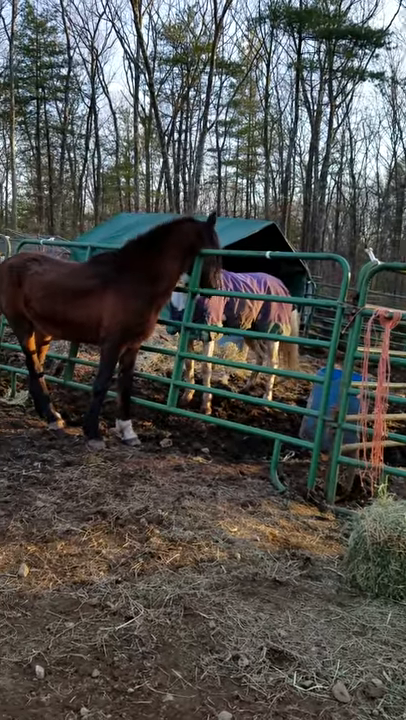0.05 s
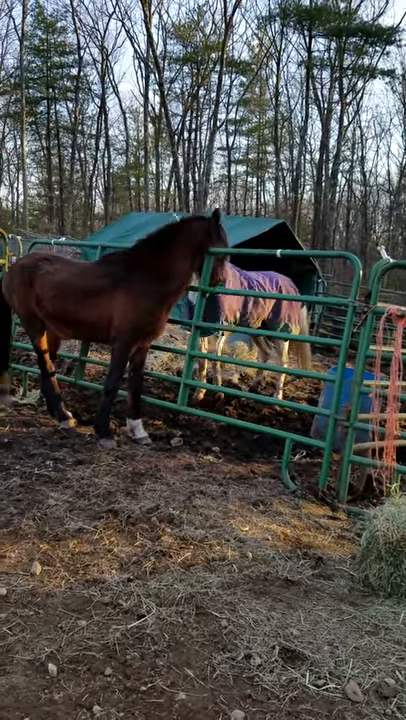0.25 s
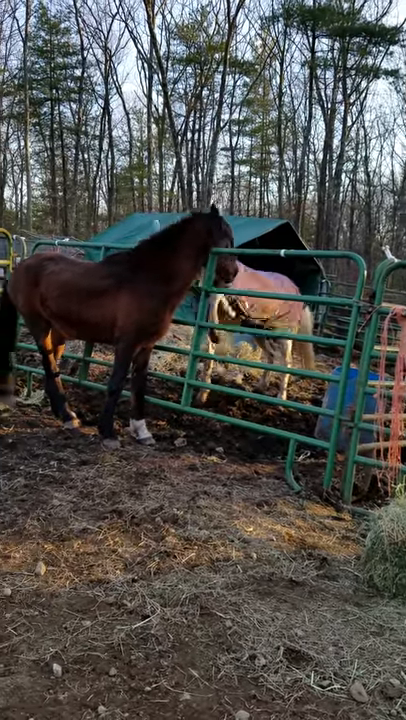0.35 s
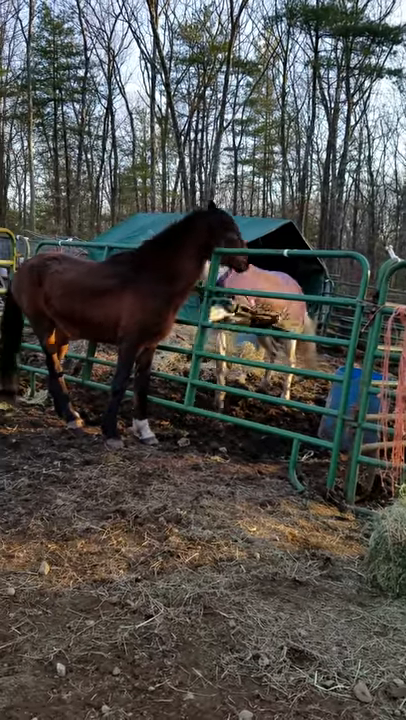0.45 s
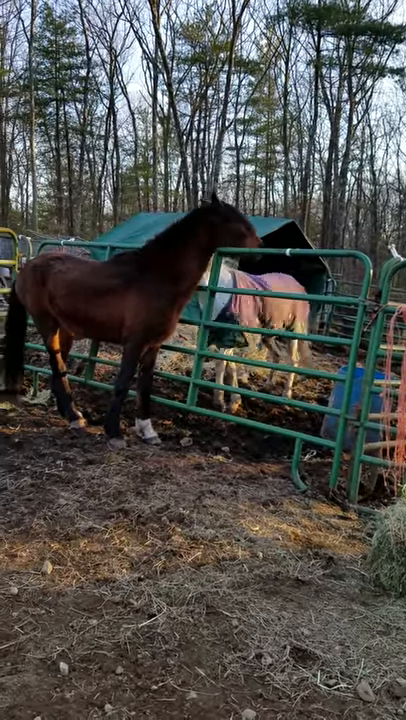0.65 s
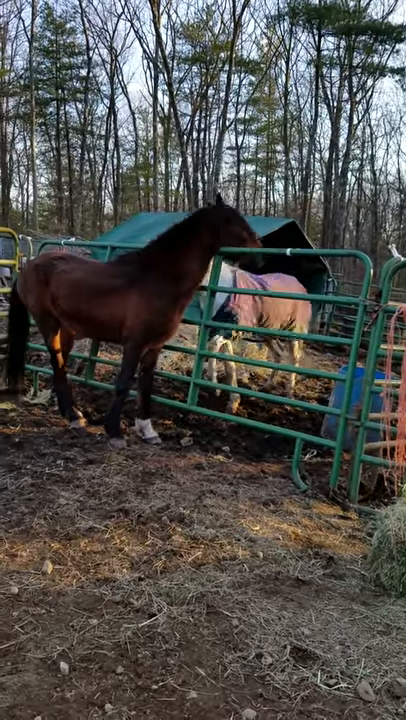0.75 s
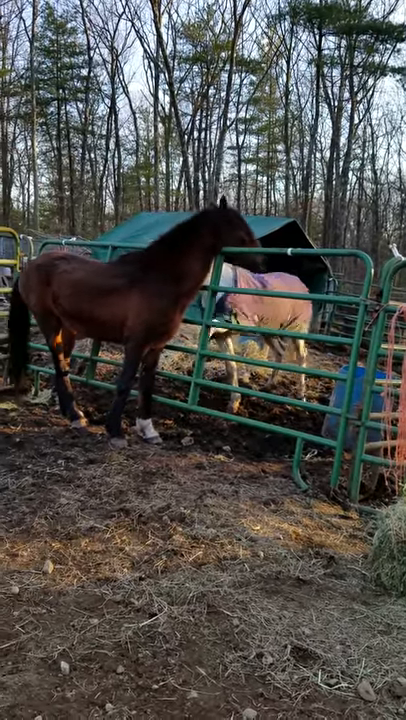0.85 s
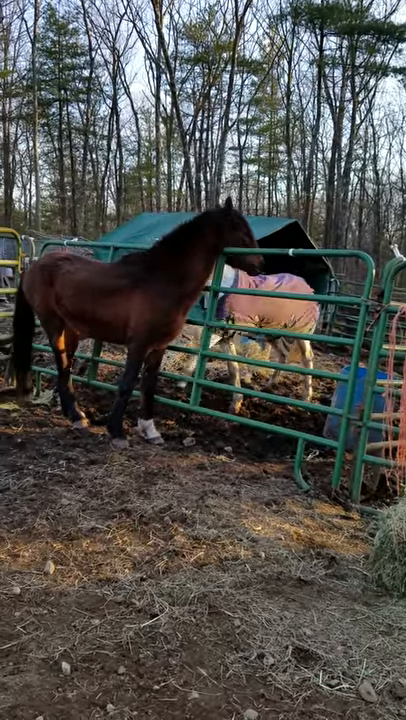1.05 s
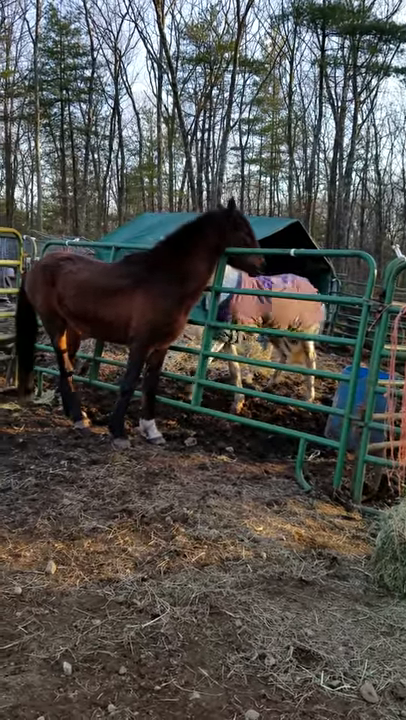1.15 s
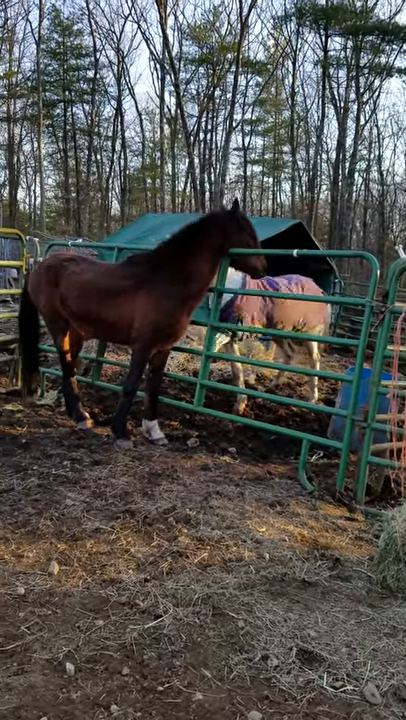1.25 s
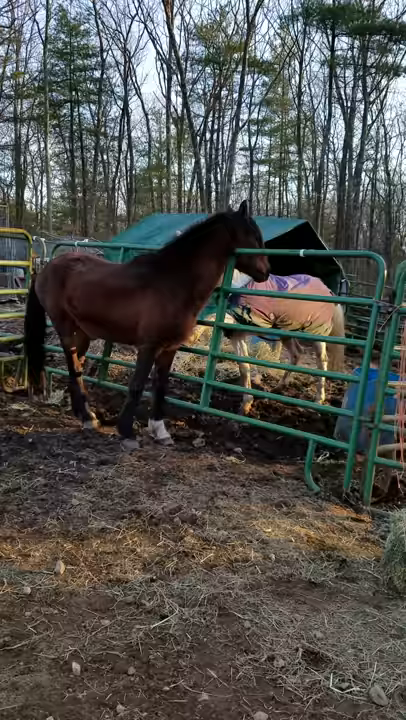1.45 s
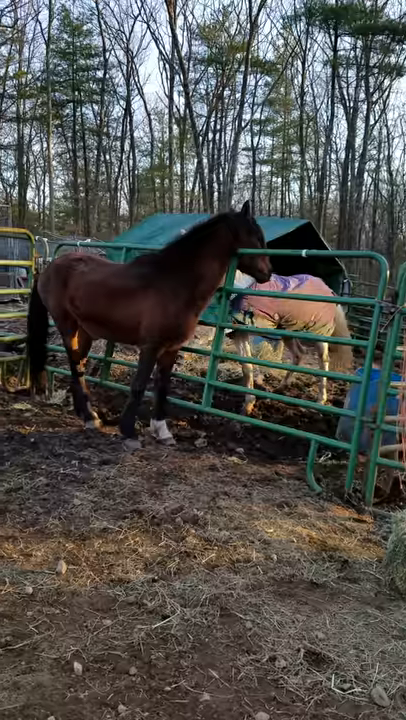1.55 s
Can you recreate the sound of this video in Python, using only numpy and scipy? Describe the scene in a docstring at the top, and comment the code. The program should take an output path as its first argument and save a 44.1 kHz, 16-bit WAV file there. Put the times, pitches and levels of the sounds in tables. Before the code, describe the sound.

A horse roars once, close by in a quiet paddock. Faint hoof knocks and a tiny metal clink come first. At 0.2 seconds its mouth snaps and a loud, low growl begins, breaking into a rough bellow at 0.5 and a short, clear squeal at 0.8. The call ends by 1 second with a light echo. Faint hoof scuffs, a knock and a distant bird's rising whistles follow until 1.6.

```python
"""In a paddock, a horse roars once. Its vocal folds send pulses through its throat: a low growl
with every second pulse weak breaks into a rough bellow, then flips up into a short clear squeal.
The shelter and the wood behind throw the call back. Hooves knock and scuff faintly, metal clinks,
and a far bird repeats a rising whistle over quiet outdoor air."""
import sys
import numpy as np
from scipy import signal
from scipy.fft import rfft, irfft, next_fast_len
from scipy.io import wavfile
from scipy.ndimage import uniform_filter1d

SR = 44100
rng = np.random.default_rng(int(sys.argv[2]) if len(sys.argv) > 2 else 0)


def bounce(signal):
    """Save signal as a 16-bit WAV file at the path given by the first command-line argument."""
    frames = np.transpose(np.atleast_2d(signal))
    limited = np.clip(frames, -1, 1)
    pcm = np.round(limited * 32767).astype(np.int16)
    wavfile.write(sys.argv[1], SR, pcm)


N = 70560

# tone colour (how strong each frequency is) of the outdoor air: f/Hz, level/dB
AIR_COLOUR = [(25, -43.5), (62, 2), (110, -2.5), (250, 0), (600, -10), (1200, -12), (2500, -17.5),
              (3400, -19), (5500, -32), (9000, -29.5), (12500, -26), (15500, -26)]
# echoes from shelter and trees: delay/s, level/dB
ECHOES = [(.055, -13.5), (.115, -17.5), (.255, -30.5), (.475, -34.5), (.68, -41.5)]
# tone colour of the echoes: f/Hz, level/dB
WOOD_COLOUR = [(80, -10), (200, -3.5), (350, -2.5), (500, 2), (700, -2.5), (830, 1), (990, 1), (1250, 2),
               (1600, -1.5), (3500, -0.5), (8000, -19.5)]
# bird whistles: t/s, level/dB
WHISTLES = [(.0, -61), (0.102, -58), (0.996, -58), (1.105, -60.5), (1.216, -59.5), (1.326, -65),
            (1.436, -64), (1.556, -62)]
# ringing notes of a bit of metal, perhaps the gate: f/Hz, level/dB
CLINK_NOTES = [(1790, -48.5), (2390, -55.5), (3250, -62.5)]
# hoof knocks, scuffs in the straw, snap of the mouth: t/s, level/dB, decay/s, left minus right/dB
KNOCKS = [(.012, -48, 0.06, -6), (0.035, -42, .01, 2), (.103, -46, 0.014, -7), (1.206, -41, 0.01, -11)]
SCUFFS = [(.877, -54, .008, 3), (1.039, -47.5, 0.016, -5.5), (1.327, -53, 0.019, -5.5)]
SNAPS = [(0.197, -25.5, 0.0035, -10)]
# their tone colours: f/Hz, level/dB
KNOCK_COLOUR = [(80, -21), (300, 2), (750, 5.5), (1050, 2), (1450, -3), (1900, -7), (2200, -6),
                (2800, -15.5), (3800, -18.5), (6000, -31), (12000, -51.5)]
SCUFF_COLOUR = [(1000, 1), (3300, -5), (4500, -3), (5800, -14.5), (7650, -11.5), (7920, 5), (8200, -15),
                (12500, -14), (15500, -18)]
SNAP_COLOUR = [(150, -33.5), (700, -2.5), (1300, -0.5), (1750, 9), (2100, -10.5), (2500, 2.5), (3300, -20),
               (4650, -12.5), (5800, -32), (8000, -24.5), (14000, -44.5)]
# opening squeak, chest drone, whistle over the squeal, closing grunt:
# t/s, length/s, start f/Hz, end f/Hz, level/dB, octave above against the main note/dB
TONES = [(0.136, 0.071, 603, 533, -49.5, -8), (0.192, .36, 83.21, 85.7, -29, 1),
         (0.791, 0.1614, 1009, 969, -24, -30), (0.938, 0.037, 241.6, 214, -31.5, -14)]
# tone colour of air rasping through the vocal folds: f/Hz, level/dB
RASP_COLOUR = [(300, 0), (700, 9), (1200, 7), (1600, 3), (2300, 2), (3200, -5.5), (4300, -8.5),
               (5600, -21.5), (7800, -23.5), (9400, -32.5), (11500, -23.5), (15500, -28.5)]
# loudness of the rasp: t/s, level/dB
RASP_LEVEL = [(.14, -110), (.17, -54), (.2, -44), (.26, -39), (.33, -35), (.43, -33.5), (.53, -32),
              (.62, -40.5), (.69, -33.5), (.75, -42.5), (.84, -46.5), (.89, -33.5), (.92, -50.5),
              (.97, -59), (1.05, -110)]
# pitch of the voice: t/s, f/Hz
PITCH = [(.18, 151.8), (.21, 144), (.264, 165.9), (.32, 175.8), (.375, 178.1), (.41, 190.3), (.435, 200.6),
         (.47, 171.5), (.54, 181.2), (.60, 205.4), (.645, 220.4), (.668, 205.5), (.72, 221), (.76, 230.8),
         (.783, 245.4), (.792, 372.9), (.815, 351), (.87, 341.1), (.94, 333.4)]
# loudness of the voice: t/s, level/dB
EFFORT = [(.15, -84), (.19, -32.5), (.24, -28), (.275, -22.5), (.35, -17), (.45, -20), (.49, -19),
          (.505, -17), (.61, -17.5), (.667, -20.5), (.69, -18), (.75, -16.5), (.785, -18), (.81, -17),
          (.875, -16.5), (.915, -27), (.945, -43.5), (.98, -67), (1.02, -110)]
# state of the vocal folds: t/s, roughness/0-1, weakening of every second pulse/0-1
FOLDS = [(.19, 0.39, 0.27), (.27, 0.12, 0.14), (.37, 0.05, 0.45), (.42, .18, 0.18), (.47, 0.71, 0.2),
         (.54, 0.54, 0.1), (.64, 0.57, 0.03), (.68, 0.21, 0.07), (.755, 0.2, 0.02), (.785, 0.44, 0.06),
         (.815, 0.21, 0.34), (.87, .14, 0.18), (.90, .4, 0)]
# chest resonances that smear each pulse in time: f/Hz, width/Hz
CHEST = [(170, 108), (520, 247)]
# tone colour of the throat in each part of the call: f/Hz, level/dB
GROWL = [(35, -55), (60, -8), (87, -4.5), (174, 2), (260, -0.5), (350, -8), (435, -6), (540, 0), (700, -5),
         (790, -28.5), (900, -0.5), (1050, -19.5), (1200, -20), (1420, -18.5), (1750, -30), (2150, -20),
         (2700, -45), (4000, -42.5), (6000, -64.5)]
BELLOW = [(45, -43), (100, -2), (205, 0), (300, -3), (410, 0), (520, -13.5), (680, 8), (850, -4.5),
          (1030, -3.5), (1170, -33), (1330, -19.5), (1520, -8), (1800, -34), (2400, -37), (3500, -31.5),
          (4500, -59), (6000, -54.5)]
SQUEAL = [(70, -53), (150, -16.5), (230, 6), (345, 4), (500, -5), (690, 5.5), (1000, -7), (1170, -21),
          (1380, -23.5), (1560, -5.5), (1750, -20), (2100, -33), (2800, -20.5), (3200, -36.5),
          (3650, -26.5), (6000, -58.5)]
# how the call leans to one side: f/Hz, left minus right/dB
SIDES = [(60, -1.5), (200, -3.5), (380, -5.5), (540, -7.5), (700, 1), (1000, -2.5), (2400, -5), (4400, -7),
         (8100, -6), (15000, 8)]

WHISTLE_LOW_HZ, WHISTLE_TOP_HZ, WHISTLE_RISE_S, WHISTLE_S = 1605, 3216, .014, 0.047
BELLOW_AT_S, BELLOW_FADE_S, SQUEAL_AT_S, SQUEAL_FADE_S = 0.48, 0.12, .79, 0.056
CLOSE_AT_S, CLOSE_FADE_S, CLOSE_HZ = 0.8836, 0.02, 620
# chance changes at full roughness, in pulse timing, pulse size, pitch and loudness
JITTER_CYCLES, SHIMMER_DB, WAVER_SHARE, FLUTTER_DB = 0.1463, 4, .012, 2.5


def undb(db):
    """Turn decibels into a number to multiply by."""
    return 10 ** (np.asarray(db) / 20)


def unit(x):
    """Scale a sound to an average (rms) strength of 1."""
    return x / np.sqrt(np.mean(x ** 2) + 1e-18)


def curve(rows, t, column=1):
    """Read a table column at times t, joining its points with straight lines."""
    rows = np.array(rows, float)
    return np.interp(t, rows[:, 0], rows[:, column])


def level_at(points, hz):
    """Read a table's level at any frequency, with octaves evenly spaced."""
    points = np.array(points, float)
    return np.interp(np.log(hz + 1), np.log(points[:, 0]), points[:, 1])


def convolve(x, response):
    """Make every sample of a sound set off a copy of the response."""
    size = next_fast_len(2 * N)
    return irfft(rfft(x, size) * rfft(response, size), size)[..., :N]


def colour(x, points):
    """Give a sound the tone colour in a table."""
    size = 4096
    gain = undb(level_at(points, np.fft.rfftfreq(size, 1 / SR)))
    # make the filter ring only after a sound, never before it
    cepstrum = irfft(np.log(gain))
    cepstrum[1:size // 2] *= 2
    cepstrum[size // 2 + 1:] = 0
    return convolve(x, irfft(np.exp(rfft(cepstrum))))


def cut_lows(x, hz, order=2):
    """Turn down everything below a frequency."""
    return signal.sosfilt(signal.butter(order, hz, "high", fs=SR, output="sos"), x)


def wander(rate_hz):
    """A smooth random wobble, about 1 in size."""
    hold = int(SR / rate_hz)
    steps = np.repeat(rng.standard_normal(N // hold + 1), hold)
    return unit(uniform_filter1d(uniform_filter1d(steps, hold), hold)[:N])


def ramp(t, middle, length):
    """Rise from 0 to 1 around a moment."""
    return np.clip((t - middle) / length + .5, 0, 1)


def bursts(t, rows, shape, attack_s):
    """Short bursts of noise that share a tone colour, rise fast and die away."""
    out = np.zeros((2, N))
    for start, db, decay, pan_db in rows:
        age = np.maximum(t - start, 0)
        envelope = np.minimum(age / attack_s, 1) * np.exp(-age / decay)
        noise = unit(colour(rng.standard_normal(N), shape))
        out += noise * envelope * undb(db + np.array([[pan_db], [-pan_db]]) / 2)
    return out


def air(level_db=-54.5):
    """Quiet outdoor air, the same on both sides in the bass."""
    middle, side = colour(rng.standard_normal((2, N)), AIR_COLOUR)
    width = cut_lows(side, hz=1200, order=1) * np.array([[1], [-1]])
    return undb(level_db + 0.64 * wander(6)) * unit(middle + width)


def scatter(t, decay_s):
    """Countless tiny echoes blur into a fading hiss."""
    tail = rng.standard_normal((2, N)) * np.exp(-t / decay_s) * ramp(t, decay_s / 10, decay_s / 10)
    return tail / np.sqrt(np.sum(tail ** 2, axis=1, keepdims=True))


def paddock(x, t):
    """Ground and gate scatter the treble; shelter and trees return dull echoes and a thin tail."""
    near = undb(4.5) * cut_lows(scatter(t, decay_s=.01), hz=2000)
    tail = scatter(t, decay_s=1.06 / np.log(1000))  # falls 60 dB in 1.06 s
    far = undb(-16.5) * (tail[0] + .5 * tail[1] * np.array([[1], [-1]]))
    for delay, db in ECHOES:
        far[:, int(delay * SR)] += undb(db)
    return x + convolve(x, near + colour(far, WOOD_COLOUR))


def bird(t):
    """Each whistle sweeps up, swells and holds its top note as it fades."""
    out = np.zeros(N)
    for start, db in WHISTLES:
        age = np.clip(t - start, 0, WHISTLE_S)
        hz = WHISTLE_TOP_HZ + (WHISTLE_LOW_HZ - WHISTLE_TOP_HZ) * np.exp(-(age / WHISTLE_RISE_S) ** 3)
        angle = 2 * np.pi * np.cumsum(hz * (1 + 0.0066 * wander(270))) / SR
        out += undb(db) * np.sin(np.pi * age / WHISTLE_S) * np.sin(angle)
    return out


def clink(t, start_s=0.0084, decay_s=0.022):
    """Metal, struck once, rings briefly with a few notes."""
    age = np.maximum(t - start_s, 0)
    return np.exp(-age / decay_s) * sum(undb(db) * np.sin(2 * np.pi * hz * age) for hz, db in CLINK_NOTES)


def hooves(t):
    """Hooves knock on the ground and scuff crisply in the straw."""
    knocks = bursts(t, KNOCKS, KNOCK_COLOUR, attack_s=0.0011)
    return knocks + bursts(t, SCUFFS, SCUFF_COLOUR, attack_s=0.0027)


def mouth_snap(t):
    """The mouth opens with a snap."""
    return bursts(t, SNAPS, SNAP_COLOUR, attack_s=0.0022)


def gliding_tones(t):
    """Nearly pure tones in the call glide, swell and fade, apart from the pitch of the folds."""
    out = np.zeros(N)
    for start, length, from_hz, to_hz, db, octave_db in TONES:
        progress = np.clip((t - start) / length, 0, 1)
        hz = (from_hz + (to_hz - from_hz) * progress) * (1 + 0.0059 * wander(99.84))
        angle = 2 * np.pi * np.cumsum(hz) / SR
        swell = np.sqrt(2) * np.sin(np.pi * progress) * undb(db + 2.5 * wander(120))
        out += swell * (np.sin(angle) + undb(octave_db) * np.sin(2 * angle))
    return out


def rasp(t, phase, steady_flow=.25, decay_cycles=0.33):
    """Air hisses through the folds, with an extra puff at each pulse."""
    puffs = unit(steady_flow + np.exp(-phase / decay_cycles)) * undb(2.0 * wander(91.53))
    hiss = unit(colour(puffs * rng.standard_normal((2, N)), RASP_COLOUR))
    return hiss * undb(curve(RASP_LEVEL, t))


def vocal_folds(t):
    """One pulse a cycle, strong and weak in turn; roughness scatters their timing and size."""
    hz = curve(PITCH, t) * (1 + WAVER_SHARE * curve(FOLDS, t) * wander(59.92))
    cycles = np.cumsum(hz) / SR
    count = np.arange(1, int(cycles[-1]) - 1)
    time_chance, size_chance = rng.standard_normal((len(count), 2)).T
    due = np.interp(count, cycles, t)
    rough, weakening = curve(FOLDS, due), curve(FOLDS, due, column=2)
    when = np.sort(np.interp(count + JITTER_CYCLES * rough * time_chance, cycles, t))
    size = undb(SHIMMER_DB * rough * np.clip(size_chance, -2, 2)) * (1 + weakening * (-1) ** count)
    # share each pulse between its two nearest samples
    sample, part = (when * SR).astype(int), when * SR % 1
    pulses = np.bincount(sample, size * (1 - part), N + 1) + np.bincount(sample + 1, size * part, N + 1)
    phase = np.interp(t, when, count) % 1  # runs from 0 to 1 between pulses
    return pulses[:N], phase


def chest(x):
    """Resonances hold back the lows of each pulse without making them louder."""
    for hz, width in CHEST:
        x = x - 2 * signal.lfilter(*signal.iirpeak(hz, hz / width, fs=SR), x)
    return x


def throat(pulses, t):
    """Pulses ring a throat that moves from growl to bellow to squeal, at an even loudness."""
    bellow, squeal = ramp(t, BELLOW_AT_S, BELLOW_FADE_S), ramp(t, SQUEAL_AT_S, SQUEAL_FADE_S)
    voice = (1 - bellow) * colour(pulses, GROWL) + bellow * colour(pulses, BELLOW)
    voice = (1 - squeal) * voice + squeal * colour(pulses, SQUEAL)
    # the lows drop out as the squeal ends; filtering forwards and backwards adds no delay
    thin = cut_lows(cut_lows(voice, CLOSE_HZ)[::-1], CLOSE_HZ)[::-1]
    closing = ramp(t, CLOSE_AT_S, CLOSE_FADE_S)
    voice = (1 - closing) * voice + closing * thin
    power = np.abs(uniform_filter1d(voice ** 2, size=1800))
    return voice / np.sqrt(power + 1e-12)


def horse(t):
    """The whole roar: a voice that surges when it is rough, rasping air and gliding tones."""
    pulses, phase = vocal_folds(t)
    breath = rasp(t, phase)
    level_db = curve(EFFORT, t) + FLUTTER_DB * curve(FOLDS, t) * wander(110.2)
    return throat(chest(pulses), t) * undb(level_db) + breath + gliding_tones(t)


def place_call(x, left_lag_s=.00005):
    """The call reaches the left side a little later, and weaker at most frequencies."""
    hz = np.fft.rfftfreq(N, 1 / SR)
    lean_db = level_at(SIDES, hz)
    left = undb(lean_db / 2) * np.exp(-2j * np.pi * hz * left_lag_s)
    right = undb(-lean_db / 2)
    return irfft(rfft(x) * np.array([left, right]), N)


def scene():
    """Horse, metal and bird echo in the paddock, over the quiet air."""
    t = np.arange(N) / SR
    call = place_call(horse(t)) + mouth_snap(t)
    return paddock(call + hooves(t) + clink(t) + bird(t), t) + air()


def record(dry):
    """Cut the deepest bass and the highest treble."""
    dry = cut_lows(dry, hz=42, order=3)
    return signal.sosfilt(signal.ellip(10, .1, 80, 15800, fs=SR, output="sos"), dry)


dry = scene()
out = record(dry)
bounce(out)
```